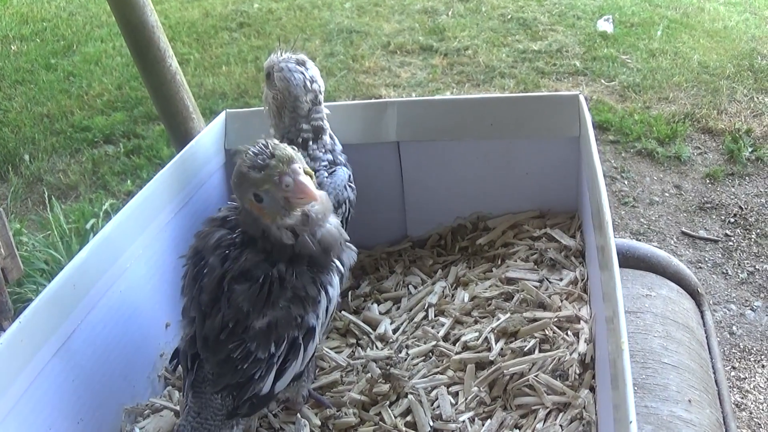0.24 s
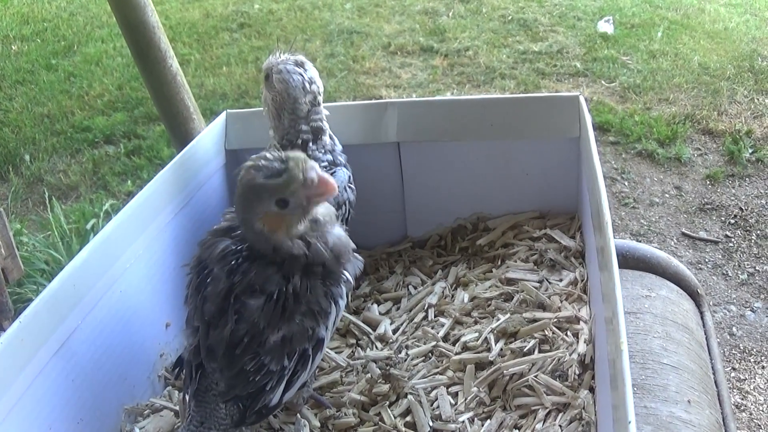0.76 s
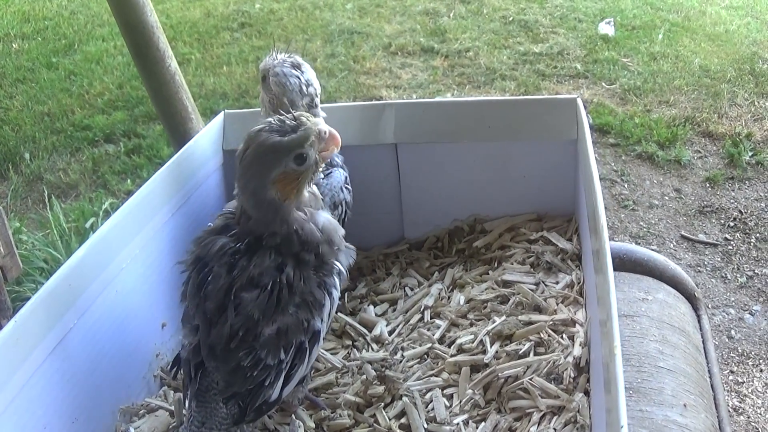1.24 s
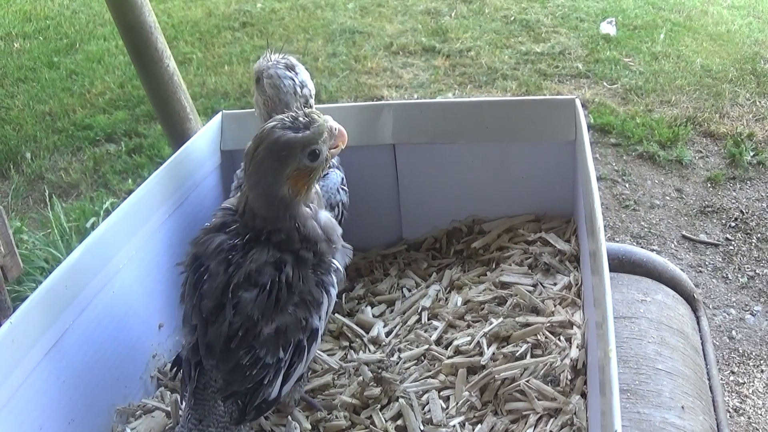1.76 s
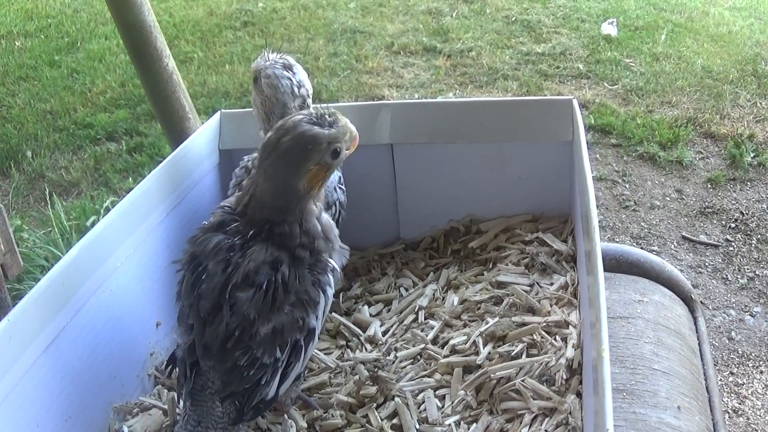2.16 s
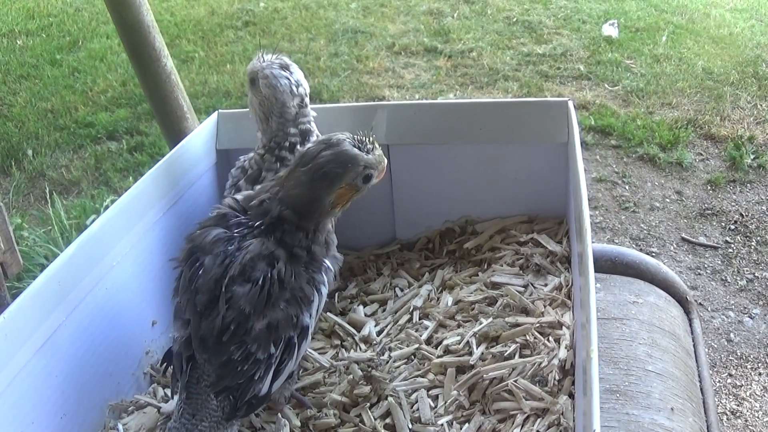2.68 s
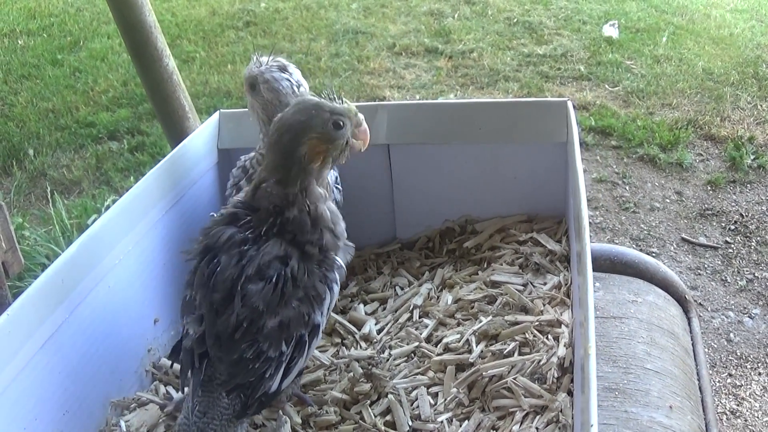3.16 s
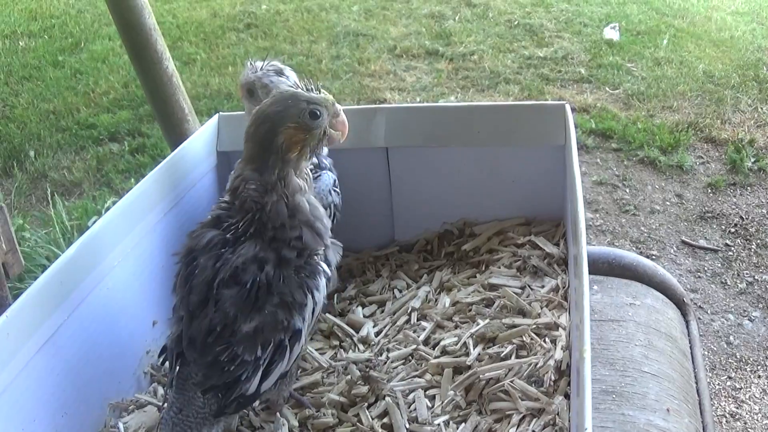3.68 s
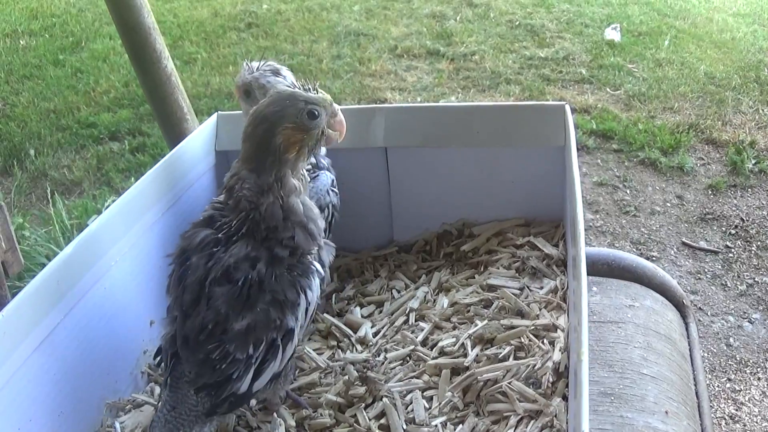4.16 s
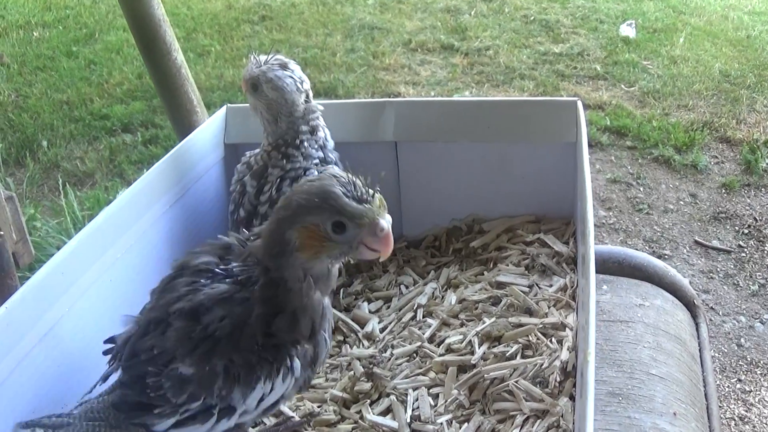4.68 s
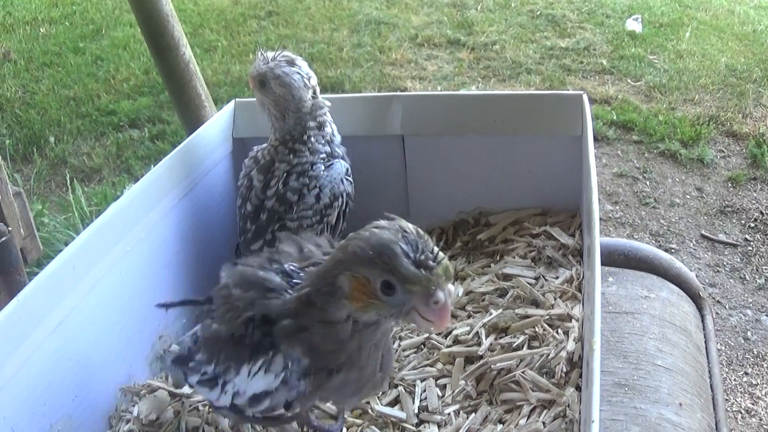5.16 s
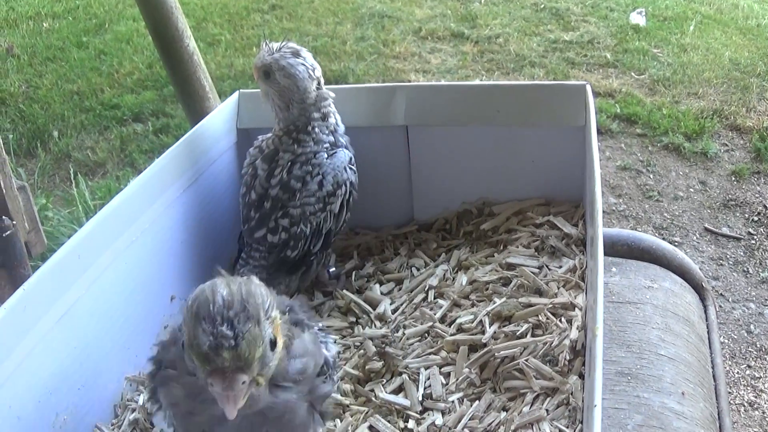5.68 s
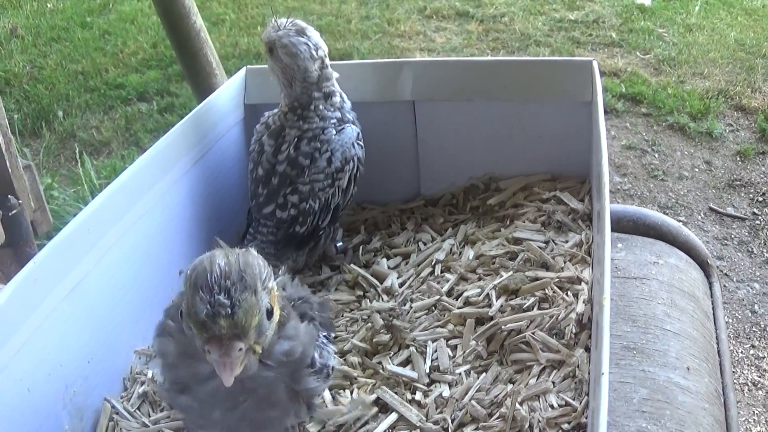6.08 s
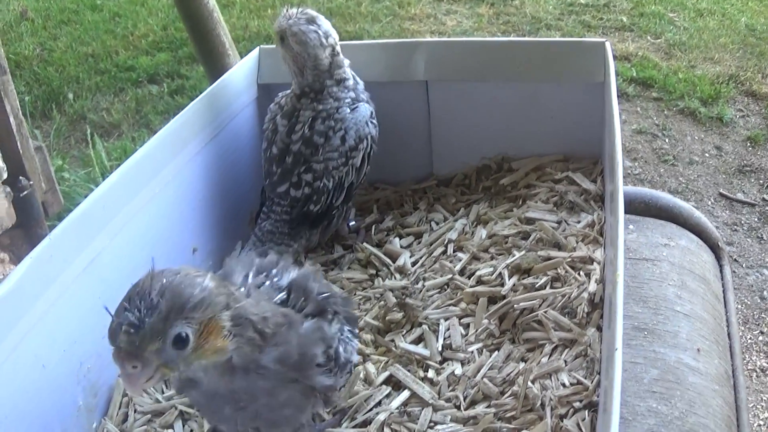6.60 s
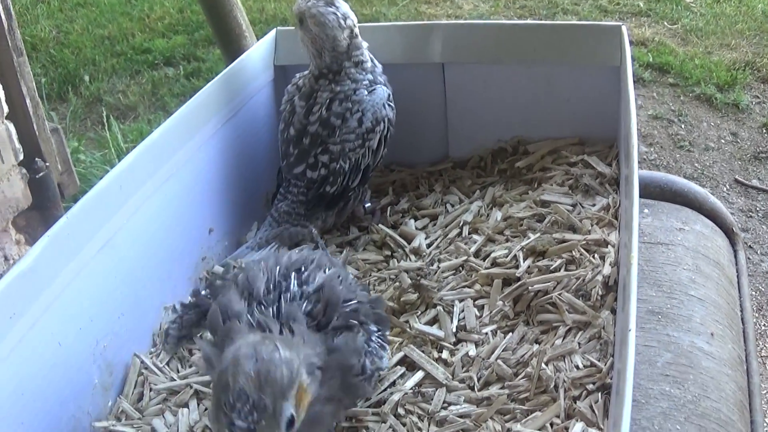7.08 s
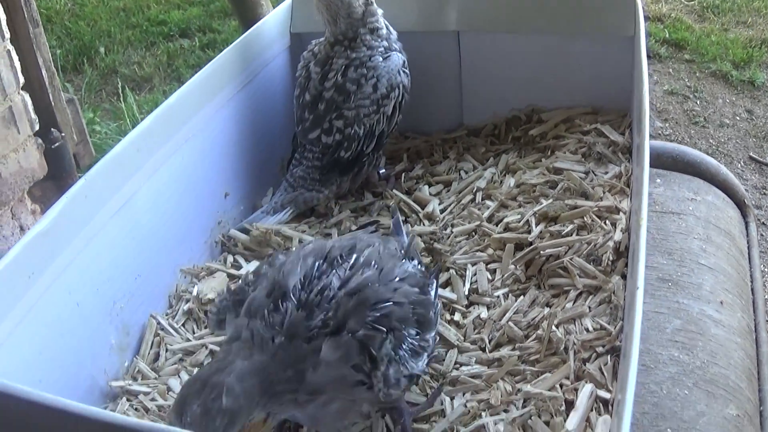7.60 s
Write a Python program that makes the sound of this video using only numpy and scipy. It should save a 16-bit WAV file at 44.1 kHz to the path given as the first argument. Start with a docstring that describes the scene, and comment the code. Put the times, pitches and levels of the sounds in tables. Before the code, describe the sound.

Young cockatiel chicks in a box outdoors give rapid runs of shrill, reedy chirps, pause, then call again over scuffing shavings and faint yard hush.

```python
"""Chicks in a box

Chicks in a box under a shelter call in quick runs: rising reedy glides, summed from trembling partials, break
into shrill whistles, and sparse echoes of the shelter ring after them. Single slurred notes and a cricket are
short sliding tones, a low cluck is a stack of harmonics, taps are bursts of noise and thuds are dying sines.
Shaped noise makes the scuffing in the bedding, the puffs of wind on the microphone and the hush of the yard."""
import sys
import numpy as np
from scipy import signal
from scipy.fft import rfft, irfft
from scipy.io import wavfile

SR = 44100
rng = np.random.default_rng(int(sys.argv[2]) if len(sys.argv) > 2 else 0)


def inscribe(sig):
    """Save sig as 16-bit PCM at rate SR to the path in sys.argv[1].

    A 1-D sig is mono; a 2-D sig holds one channel per row.
    Samples are clipped to [-1, 1] before scaling.
    """
    pcm = np.round(np.clip(np.atleast_2d(sig).T, -1, 1) * 32767)
    wavfile.write(sys.argv[1], SR, pcm.astype(np.int16))


N = 345744

# Air and bedding on the move. Each row: time in seconds, wind level in dB, scuffing level in dB.
STIR = [(0, -101, -76.5), (2.4, -72, -63.5), (2.6, -67, -66.5), (2.74, -66, -56), (2.92, -60.5, -54.5),
        (3.0, -64, -60), (3.2, -73, -65), (3.9, -75, -65.5), (4.75, -68, -60.5), (4.93, -59, -47),
        (5.1, -70, -58), (5.7, -65, -58), (5.82, -92, -47), (5.95, -65, -55), (6.8, -67, -57),
        (7.62, -76, -59.5), (7.73, -45, -48.5), (7.84, -60, -60)]


def amp(db):
    """Amplitude factor of a level in dB."""
    return 10 ** (np.asarray(db) / 20)


def unit(x):
    """Scale to an rms of 1."""
    return x / np.sqrt(np.mean(x ** 2) + 1e-20)


def read(points, hz):
    """Read a table over frequency, straight lines along a log axis."""
    f, value = np.transpose(points)
    return np.interp(np.log(hz + 1), np.log(f + 1), value)


def curve(rows):
    """Columns of a table over time, at every sample."""
    s, *columns = np.transpose(rows)
    return [np.interp(np.arange(N) / SR, s, c) for c in columns]


def add(mix, s, sound):
    """Lay a sound into the mix from s seconds on, cut off at the end."""
    part = mix[..., round(s * SR):][..., :sound.shape[-1]]
    part += sound[..., :part.shape[-1]]


def sides(pan_db):
    """Left and right factors for a level difference in dB."""
    return amp(np.array([pan_db / 2, -pan_db / 2]))


def wobble(n, top_hz):
    """Smooth random motion of rms 1: noise below top_hz."""
    low_pass = signal.butter(2, top_hz, fs=SR, output="sos")
    motion = signal.sosfilt(low_pass, rng.standard_normal(n + SR // 50))
    return unit(motion[-n:])  # leaves out the start of the filter


def alike(a, b, hz):
    """Left and right from two unrelated spectra, as alike as the two microphones hear them."""
    # Each row: frequency in Hz, likeness of the channels from 0 to 1.
    likeness = [(25, 0.98), (125, 1), (500, 0.72), (3000, 0.32), (8000, 0.55), (13000, 1)]
    same = np.clip(read(likeness, hz), 0, 1)
    mid = np.sqrt((1 + same) / 2) * a
    side = np.sqrt((1 - same) / 2) * b
    return np.array([mid + side, mid - side])


def coloured(points):
    """Two partly alike channels of noise with a given spectrum, rms 1."""
    hz = np.fft.rfftfreq(N, 1 / SR)
    left_right = alike(*rfft(rng.standard_normal((2, N))), hz)
    return unit(irfft(left_right * amp(read(points, hz)), N))


def voice(length, first_hz, last_hz, bend, partials_db, rough, rise, fall=0.002):
    """Partials of a membrane whose pitch trembles and whose swing flutters the more, the rougher it is."""
    n = int(length * SR)
    u = np.arange(n) / n  # progress through the note, 0-1
    slide_hz = last_hz - (last_hz - first_hz) * (1 - u) ** bend
    hz = slide_hz * (1 + (.008 + .1 * rough ** 2) * wobble(n, 300))
    turns = np.cumsum(hz) / SR
    out = np.zeros(n)
    for k, db in enumerate(partials_db, start=1):
        flutter = 1 + 1.2 * rough * wobble(n, 200)
        partial = np.sqrt(2) * np.sin(2 * np.pi * (k * turns + rng.random()))
        out += amp(db) * flutter * partial * (k * hz < SR / 2.2)  # silent near half the sample rate
    out *= 1 + rough ** 3 * np.cos(np.pi * turns)  # strong and weak swings take turns: lines at half pitch
    fade_in = np.minimum(u * length / rise, 1)
    fade_out = np.minimum((1 - u) * length / fall, 1)
    return out * fade_in * fade_out


def yard():
    """The hush of the yard: steady noise with a broad spectrum."""
    # Each row: frequency in Hz, relative level in dB.
    hush = [(35, -112), (60, -5), (253, -1), (443, -9), (738, -4.5), (1020, -10.5), (3190, -7.5),
            (4850, -14.5), (5450, -13.5), (15500, -19)]
    return amp(-61) * coloured(hush)


def wind():
    """Puffs of air on the microphone, far down in the bass."""
    puff_db = curve(STIR)[0]
    return amp(puff_db) * coloured([(15, -15.5), (50, -19.5), (110, -11), (250, -37), (1000, -61)])


def bedding():
    """Feet and feathers scuff the shavings: low lumpy noise."""
    lumps = amp(2.8 * wobble(N, 18.4))
    shavings = coloured([(80, -10.5), (250, -7.5), (650, -12.5), (1000, -13.5), (5000, -33.5)])
    scuff_db = curve(STIR)[1]
    return amp(scuff_db) * unit(lumps * shavings)


def whistles():
    """Tone and air of the whistles: up to three partials; the high ones break out harshly and stay hoarser."""
    # Each row: start in seconds, length in seconds, first pitch in Hz, last pitch in Hz,
    # level of the fundamental in dB ahead of the mix.
    whistle_rows = [(0.0, 0.017, 4564, 4640, -9.5), (0.087, 0.042, 4390, 4714, -19),
                    (0.195, 0.047, 4224, 4560, -18), (0.304, 0.041, 4600, 4350, -19.5),
                    (0.418, 0.052, 5010, 4135, -20), (0.482, 0.019, 6220, 6180, -16.5),
                    (0.533, 0.044, 4500, 4930, -16), (0.641, 0.025, 6320, 6240, -19.5),
                    (0.671, 0.032, 4070, 4300, -17), (0.689, 0.02, 4560, 4820, -14),
                    (0.79, 0.02, 6820, 6140, -17.5), (0.927, 0.047, 4075, 4308, -23),
                    (1.034, 0.041, 4140, 4370, -21.5), (1.137, 0.041, 4180, 4333, -20),
                    (1.237, 0.041, 4216, 4220, -17), (1.331, 0.043, 4174, 4313, -16),
                    (1.445, 0.033, 4237, 4220, -16), (1.548, 0.03, 4240, 4207, -14.5),
                    (1.653, 0.033, 4282, 4153, -15), (1.764, 0.054, 4154, 3925, -20.5),
                    (1.899, 0.032, 4066, 3845, -16.5), (2.6, 0.013, 3460, 3150, -33.5),
                    (2.84, 0.03, 6370, 6400, -20), (3.013, 0.057, 6360, 6840, -21),
                    (3.199, 0.041, 6400, 6430, -19.5), (3.307, 0.012, 6860, 6460, -16.5),
                    (3.361, 0.028, 6070, 6230, -18), (3.435, 0.026, 6930, 6310, -21),
                    (3.498, 0.027, 6040, 6270, -18.5), (3.583, 0.013, 6670, 6410, -18),
                    (3.594, 0.026, 5183, 4860, -23.5), (3.881, 0.022, 6340, 6010, -19.5),
                    (4.19, 0.016, 6500, 6260, -17.5), (4.517, 0.04, 5620, 6590, -23.5),
                    (4.564, 0.011, 6670, 6770, -15.5), (4.72, 0.02, 7040, 6640, -17.5),
                    (4.868, 0.024, 6650, 6690, -17), (4.906, 0.054, 4045, 4334, -20),
                    (5.015, 0.068, 4093, 4446, -21), (5.023, 0.03, 6600, 6870, -18.5),
                    (5.118, 0.089, 3864, 4390, -21), (5.17, 0.038, 6680, 6420, -28),
                    (5.224, 0.068, 4020, 4367, -17.5), (5.339, 0.048, 3985, 4100, -19),
                    (5.442, 0.04, 3980, 4150, -17.5), (5.538, 0.056, 4490, 4315, -21),
                    (5.643, 0.023, 4310, 4040, -16), (5.729, 0.057, 3914, 3770, -28),
                    (5.961, 0.062, 3996, 3934, -18), (5.997, 0.027, 6730, 6460, -18.5),
                    (6.014, 0.033, 4120, 4910, -18.5), (6.031, 0.043, 6070, 7160, -17),
                    (6.084, 0.051, 3610, 3870, -19), (6.22, 0.05, 3920, 3790, -20.5),
                    (6.321, 0.058, 4053, 3883, -17.5), (6.879, 0.053, 6310, 5950, -18),
                    (7.179, 0.074, 6560, 6215, -21), (7.504, 0.066, 6290, 6270, -20),
                    (7.578, 0.065, 6510, 6820, -24), (7.641, 0.038, 5630, 6220, -21),
                    (7.822, 0.019, 5900, 5300, -18.5)]
    # Slow drift of the overtone. Each row: time in seconds, then its level against the
    # fundamental in dB for low whistles and for high whistles.
    overtone = [(0, -5, -11.5), (2, -7.5, -16), (5, -11.5, -10), (6.5, -11.5, -46), (7.84, -12, -7)]
    break_hz = 5200  # whistles that start above this are high
    roughness = .11, .4  # low, high
    edges_s = (.012, .01), (.003, .004)  # rise and fall: low ones swell and fade, high ones snap on
    tone, air, overtone_db = np.zeros(N), np.zeros(N), curve(overtone)
    for s, length, first_hz, last_hz, db in whistle_rows:
        high = first_hz > break_hz
        over_db = overtone_db[high][round(s * SR)]
        partials_db = db + np.array([0, over_db, over_db - 7.5])
        note = voice(length, first_hz, last_hz, 1.557, partials_db, roughness[high], *edges_s[high])
        add(tone, s, note)
        add(air, s, amp(-18.5) * abs(note))
        rasp = high * amp(-5) * note.std() * np.hanning(int(.024 * SR))  # where the voice breaks
        add(air, max(s - .012, 0), rasp)
    return tone, air


def taps():
    """Beaks and claws tick on the box wall: a few ms of scraping contact, coloured by the wall."""
    # Each row: start in seconds, peak in dB, brightness in dB per octave.
    tap_rows = [(0.019, -23.5, 7.5), (2.357, -22, 4.5), (2.381, -30, 8.5), (4.478, -17.5, 9.5),
                (6.737, -33.5, 14), (7.266, -22, 3.5)]
    # Each row: frequency in Hz, level in dB.
    wall = [(300, -26), (900, 10), (1300, -4), (2700, -6.5), (8000, -25.5), (10000, -25), (15000, -47)]
    out, t = np.zeros(N), np.arange(2048) / SR
    hz = np.fft.rfftfreq(len(t), 1 / SR)
    for s, db, bright_db in tap_rows:
        colour_db = read(wall, hz) + bright_db * np.log2(hz / 1000 + 0.12)
        scrape = irfft(rfft(rng.standard_normal(len(t))) * amp(colour_db))
        hit = scrape * amp(-60 * t / 0.031) * np.minimum(t / 0.001, 1)
        add(out, s, amp(db) * hit / abs(hit).max())
    return out


def glides():
    """Tone and air of the reedy glides: six partials coloured by the throat, a rasp where the voice starts."""
    # Each row: start in seconds, length in seconds, first pitch in Hz, last pitch in Hz,
    # level in dB ahead of the throat and the mix, level of the 2nd partial in dB ahead of the mix.
    glide_rows = [(0.078, 0.011, 1930, 2480, -35.5, -21), (0.183, 0.015, 2020, 2520, -37, -20),
                  (0.292, 0.016, 2020, 2560, -38, -19.5), (0.4, 0.025, 2067, 2385, -31, -19.5),
                  (0.442, 0.033, 2265, 2090, -27.5, -34), (0.523, 0.013, 2140, 2360, -35, -24),
                  (0.597, 0.035, 2155, 2367, -19.5, -23), (0.75, 0.03, 2466, 2860, -27, -21.5),
                  (0.922, 0.013, 2062, 2160, -37, -36), (1.024, 0.014, 2104, 2120, -36, -33),
                  (1.127, 0.014, 2226, 2120, -38.5, -43), (1.227, 0.02, 2130, 2310, -36, -30),
                  (1.318, 0.025, 2193, 2350, -35.5, -29.5), (1.435, 0.016, 2095, 2264, -36.5, -37.5),
                  (1.538, 0.0091, 1940, 2250, -32.5, -29.5), (1.648, 0.013, 1995, 2347, -36, -28),
                  (1.761, 0.014, 2124, 2295, -36, -30), (1.879, 0.023, 1842, 2075, -35, -31),
                  (2.8, 0.068, 1560, 2280, -32, -31.5), (2.977, 0.05, 2115, 2610, -27.5, -23.5),
                  (3.12, 0.06, 1954, 2790, -29, -31), (3.155, 0.044, 1877, 2430, -27.5, -24),
                  (3.254, 0.072, 2474, 2895, -33.5, -33), (3.322, 0.033, 2060, 2623, -25, -22),
                  (3.392, 0.057, 2566, 2888, -34, -50), (3.463, 0.04, 2326, 3955, -27, -25.5),
                  (3.533, 0.051, 1850, 2864, -33, -50), (3.823, 0.051, 1675, 2150, -27, -24),
                  (4.144, 0.044, 1762, 2282, -27, -22.5), (4.442, 0.074, 2250, 2562, -31.5, -25),
                  (4.464, 0.044, 2036, 2162, -28, -17), (4.501, 0.072, 2654, 3160, -33.5, -32),
                  (4.665, 0.065, 2613, 2930, -30.5, -35), (4.756, 0.021, 1714, 1730, -43, -28),
                  (4.79, 0.061, 3097, 2953, -31, -36.5), (4.846, 0.029, 2856, 3198, -27, -51),
                  (4.982, 0.052, 2680, 2875, -30, -38.5), (5.119, 0.067, 2675, 2793, -30, -34.5),
                  (5.2, 0.066, 2665, 3225, -43.5, -46), (5.314, 0.055, 2890, 3120, -35, -25),
                  (5.416, 0.049, 2120, 3207, -33, -31.5), (5.517, 0.065, 2560, 3176, -34.5, -29),
                  (5.616, 0.064, 2370, 3345, -33, -29), (5.709, 0.061, 2414, 3117, -34, -30),
                  (5.82, 0.062, 2605, 3095, -30.5, -23.5), (5.935, 0.054, 2680, 3180, -31.5, -27.5),
                  (6.059, 0.051, 2810, 3070, -32, -33), (6.172, 0.057, 2355, 2862, -32.5, -24.5),
                  (6.198, 0.051, 2750, 3340, -31.5, -31), (6.296, 0.049, 2340, 3013, -31.5, -29.5),
                  (6.827, 0.062, 1852, 2193, -25, -26.5), (7.131, 0.053, 1545, 2157, -26, -28.5),
                  (7.459, 0.051, 1883, 2159, -26.5, -25.5), (7.564, 0.018, 1480, 1610, -32.5, -25),
                  (7.588, 0.045, 1765, 2006, -27.5, -24.5), (7.764, 0.045, 1635, 2136, -24.5, -25.5)]
    # Colours all partials but the 2nd. Each row: frequency in Hz, level in dB.
    throat = [(1650, -17), (1950, -7), (2500, -0.5), (3100, 5.5), (4900, 10), (6400, 2), (7500, 0.5),
              (9300, 0), (11000, -3), (13500, -10.5)]
    # One run of glides turns raspy. Each row: time in seconds, added roughness from 0 to 1.
    strain_rows = [(0, 0), (4.6, 0), (4.66, .13), (5.22, .13), (5.3, 0), (7.84, 0)]
    brief_s, long_s = .025, .05  # glides shorter than the first are rough: onsets of whistles, brief squawks
    bends = 1.4, 4.3  # short glides rise nearly straight, long ones flatten out
    brief_rough, glide_rough = .46, .18
    rough_per_octave, reed_hz = (0, .42), 2200  # long glides get hoarser the higher they end
    tone, air = np.zeros(N), np.zeros(N)
    strain, = curve(strain_rows)
    multiples = np.arange(1, 7)
    for s, length, first_hz, last_hz, db, second_db in glide_rows:
        partials_db = np.where(multiples == 2, second_db, db + read(throat, multiples * last_hz))
        is_long = length > long_s
        if length < brief_s:
            rough = brief_rough
        else:
            rough = glide_rough + rough_per_octave[is_long] * np.log2(last_hz / reed_hz)
        rough = rough + strain[round(s * SR)]
        note = voice(length, first_hz, last_hz, bends[is_long], partials_db, rough, rise=.35 * length)
        add(tone, s, note)
        add(air, s, amp(-11) * rough * abs(note))
        add(air, s, amp(-2) * rough * note.std() * np.hanning(int(.02 * SR)))  # rasp of the start
    return tone, air


def chicks():
    """Glides and whistles, with the hiss of air that goes with both."""
    # Each row: frequency in Hz, relative level in dB.
    hiss_colour = [(1500, -44.5), (3000, -20), (4500, -1), (7500, -8), (10000, -7.5), (13000, -13)]
    glide_tone, glide_air = glides()
    whistle_tone, whistle_air = whistles()
    air = glide_air + whistle_air
    beak = amp(read(hiss_colour, np.fft.rfftfreq(N, 1 / SR)))
    beak /= np.sqrt(np.mean(beak ** 2))
    hiss = irfft(rfft(air * rng.standard_normal(N)) * beak, N)
    low_pass = signal.butter(6, 13200, fs=SR, output="sos")  # the calls are soft above 13 kHz
    return signal.sosfilt(low_pass, glide_tone + whistle_tone + hiss)


def shelter(x):
    """Sparse echoes of random sign from box walls, posts and roof, each band dying at its own speed."""
    # Each row: frequency in Hz, time to fall by 60 dB in seconds.
    decay = [(1500, 0.33), (4000, 0.3), (8000, 0.26), (13000, 0.19)]
    n = SR // 2
    echoes = np.zeros((2, n))
    at = np.arange(60, n - 20, 20) + rng.integers(0, 20, (2, (n - 61) // 20))  # one in every 20 samples
    np.put_along_axis(echoes, at, rng.choice([-1., 1.], at.shape), 1)
    echoes *= np.minimum(np.arange(n) / SR / 0.0017, 1)  # the echoes take a moment to build up
    hz, t, z = signal.stft(echoes, SR, nperseg=128)
    z = alike(*z, hz[:, None]) * amp(-60 * t / read(decay, hz)[:, None])
    tail = signal.istft(z, SR, nperseg=128)[1]
    return signal.fftconvolve(x[None], tail / np.linalg.norm(tail[0]), axes=1)[:, :N]


def single_notes():
    """Single slurred notes, near-pure: most are faint, one is short and loud."""
    # Each row: start in seconds, length in seconds, first pitch in Hz, last pitch in Hz, level in dB.
    note_rows = [(1.694, 0.052, 3040.0, 3400, -48.5), (4.256, 0.056, 2980, 3430, -48),
                 (4.333, 0.061, 3320, 3590, -54), (4.375, 0.059, 3390, 2890, -56),
                 (5.87, 0.093, 2120, 1980, -53.5), (6.024, 0.2, 2030, 2096, -51.5),
                 (6.227, 0.16, 2260, 1680, -46), (6.357, 0.097, 2210, 2020, -50.5),
                 (6.474, 0.11, 2355, 2586, -49), (6.513, 0.091, 2314, 2166, -46),
                 (6.582, 0.075, 1750, 1620, -54.5), (7.264, 0.12, 1900, 1740, -47),
                 (7.324, 0.065, 4500, 3920, -45), (7.378, 0.055, 3500, 3130, -43),
                 (4.821, 0.035, 1710, 1803, -30.5)]
    out = np.zeros(N)
    for s, length, first_hz, last_hz, db in note_rows:
        add(out, s, voice(length, first_hz, last_hz, 1.5, [db], .33, rise=.015, fall=.02))
    return out


def cricket():
    """Four wing strokes a chirp, each a short falling tone."""
    # First of the four strokes of each chirp, in seconds.
    chirp_s = [2.143, 2.435, 2.713, 4.026, 4.373, 6.49, 6.586, 6.77, 7.412]
    first_hz, last_hz = 4980, 4660
    out = np.zeros(N)
    for s in chirp_s:
        for stroke in range(4):
            add(out, s + .0345 * stroke, voice(.025, first_hz, last_hz, 1, [-61], .1, rise=.008))
    return out


def thuds():
    """Feet land on the box floor, which gives one dull note."""
    # Each row: start in seconds, level in dB ahead of rise and decay, pitch in Hz.
    thud_rows = [(4.478, -29, 283), (4.92, -25.5, 270), (5.317, -26, 268), (7.429, -33.5, 277),
                 (7.752, -29.5, 466)]
    out, t = np.zeros(N), np.arange(SR // 10) / SR
    for s, db, hz in thud_rows:
        note = np.sin(2 * np.pi * hz * t) * np.minimum(t / 0.0036, 1)
        add(out, s, amp(db - 60 * t / 0.031) * note)
    return out


def cluck():
    """A low call through a long throat: 21 harmonics, unsteady in pitch and level."""
    # Each row: time in seconds, pitch in Hz, level in dB.
    cluck_rows = [(6.62, 456, -51), (6.645, 467, -46.5), (6.70, 509, -43), (6.725, 512, -41),
                  (6.75, 476, -52)]
    # Each row: frequency in Hz, relative level in dB.
    long_throat = [(500, -20), (1000, -9.5), (3500, -3.5), (5000, -34), (6500, -26), (8500, -17),
                   (11000, -29)]
    hz, db = curve(cluck_rows)
    turns = np.cumsum(hz * (1 + 0.013 * wobble(N, 156))) / SR
    stack = np.zeros(N)
    for k in range(1, 22):
        stack += amp(read(long_throat, k * hz.mean())) * np.sin(2 * np.pi * k * turns)
    t = np.arange(N) / SR
    sounding = (t > cluck_rows[0][0]) & (t < cluck_rows[-1][0])
    return amp(db + 2.2 * wobble(N, 160)) * unit(stack) * sounding


def scene():
    """The calls of the chicks, their echoes, and the yard around them."""
    # Balance of the calls. Each row: time in seconds, left over right in dB.
    balance = [(0.0, -6.5), (2.31, 0), (7.84, 2)]
    calls = chicks()
    others = single_notes() + cricket() + cluck()
    direct = amp(-2.5) * calls * sides(curve(balance)[0])
    ringing = amp(-5.5) * shelter(calls + 0.88 * others)
    return direct + ringing + others + taps() + thuds() + bedding() + wind() + yard()


def record(dry):
    """The band limit of the recorder: a steep low-pass at 15.7 kHz."""
    low_pass = signal.firwin(511, 15700, window=("kaiser", 9), fs=SR)
    return signal.oaconvolve(dry, low_pass[None], "same")


dry = scene()
out = record(dry)
inscribe(out)
```